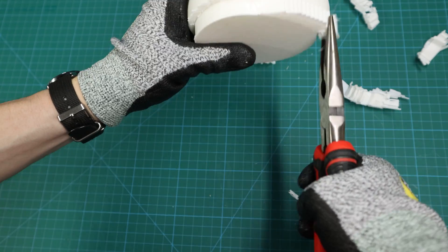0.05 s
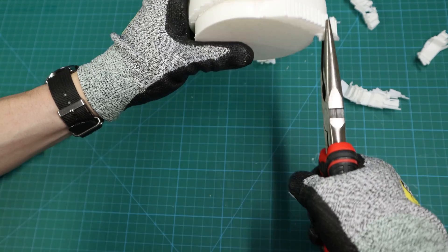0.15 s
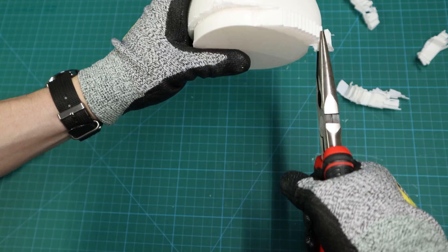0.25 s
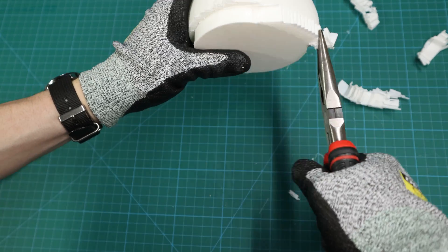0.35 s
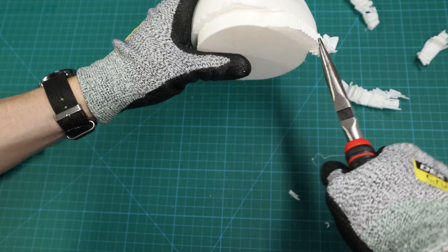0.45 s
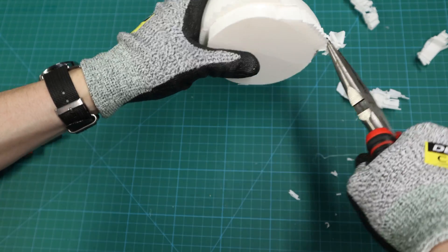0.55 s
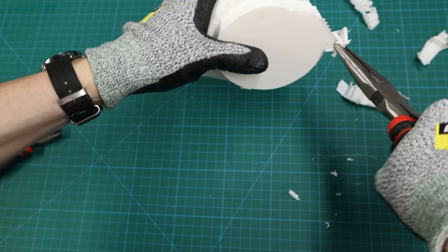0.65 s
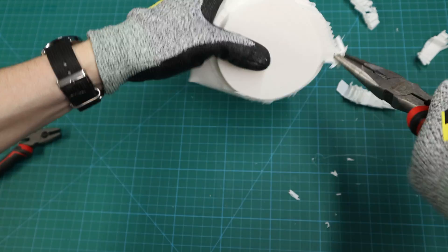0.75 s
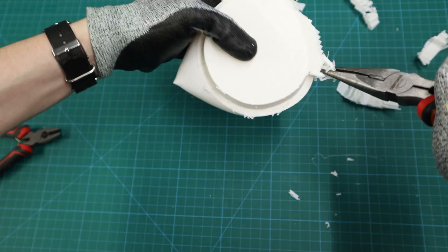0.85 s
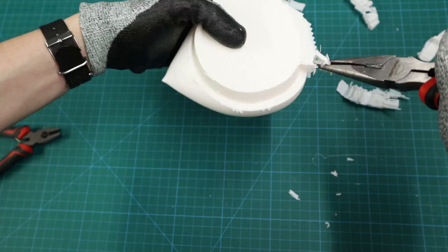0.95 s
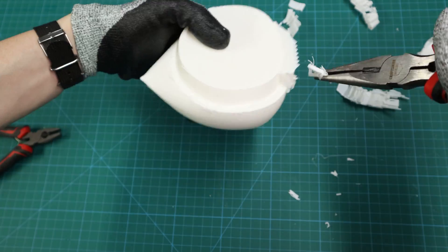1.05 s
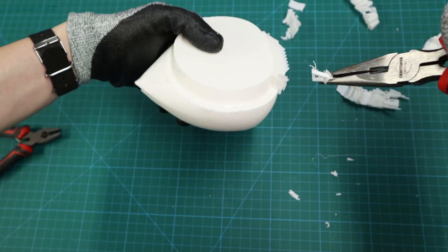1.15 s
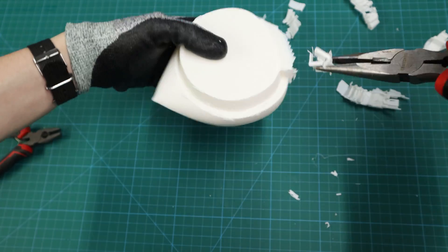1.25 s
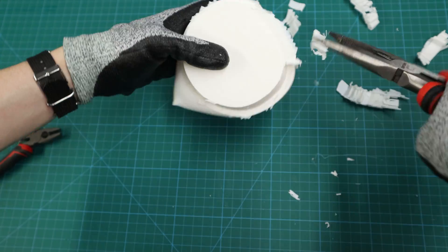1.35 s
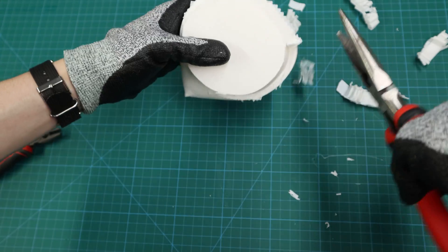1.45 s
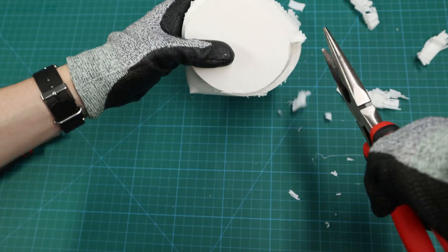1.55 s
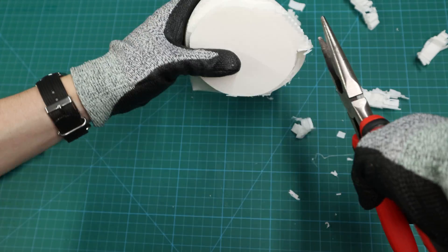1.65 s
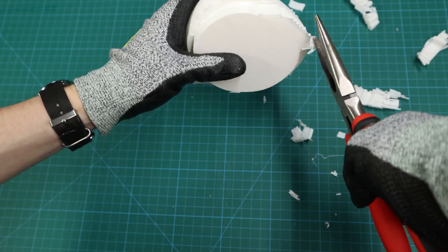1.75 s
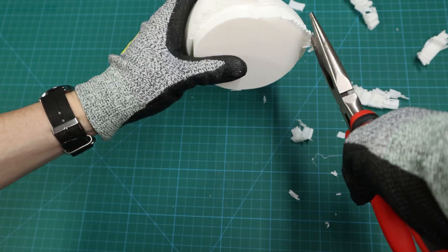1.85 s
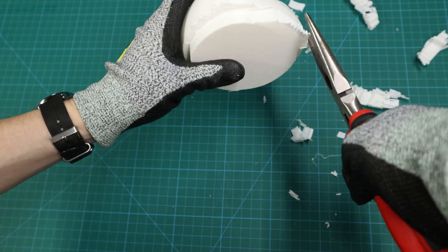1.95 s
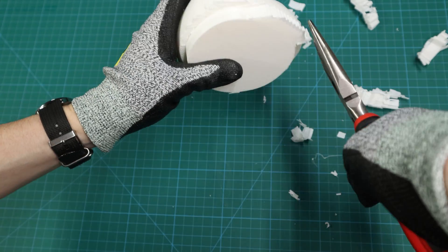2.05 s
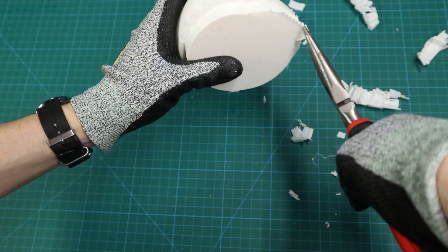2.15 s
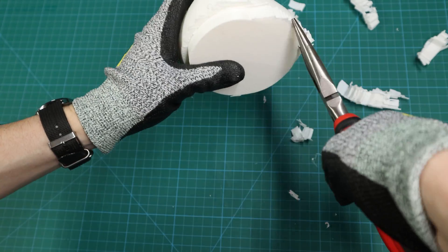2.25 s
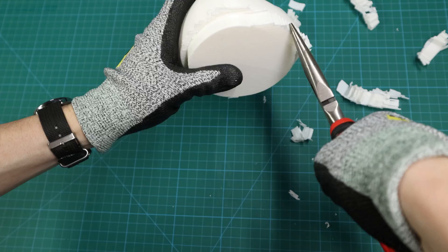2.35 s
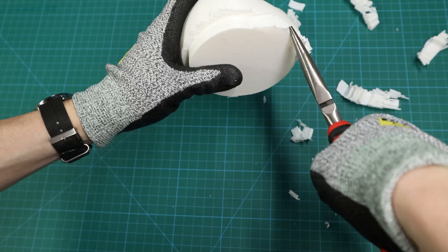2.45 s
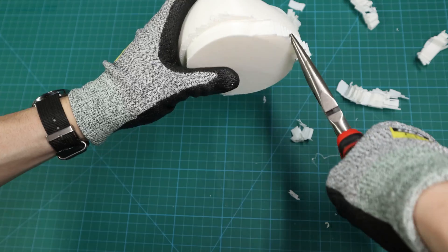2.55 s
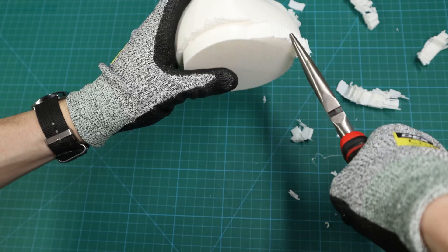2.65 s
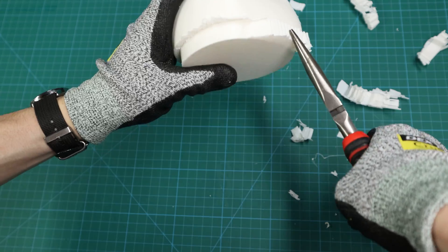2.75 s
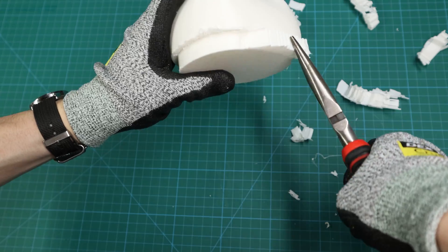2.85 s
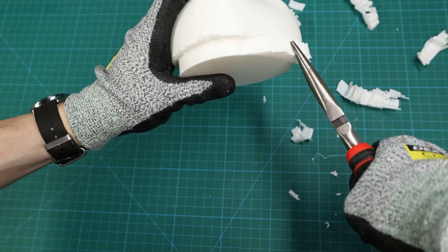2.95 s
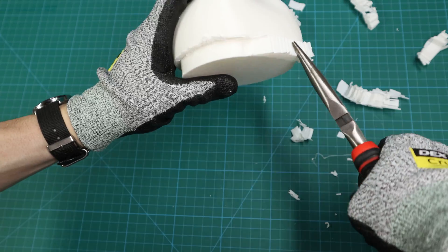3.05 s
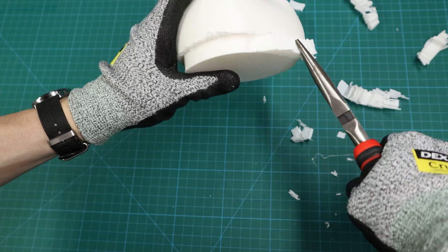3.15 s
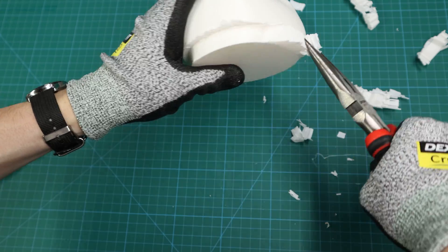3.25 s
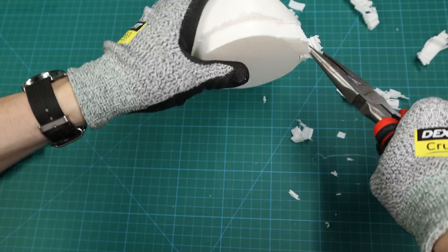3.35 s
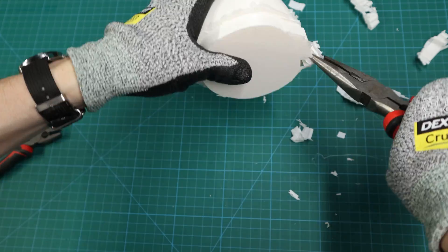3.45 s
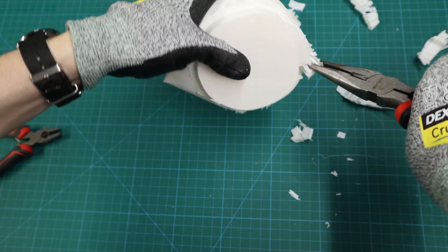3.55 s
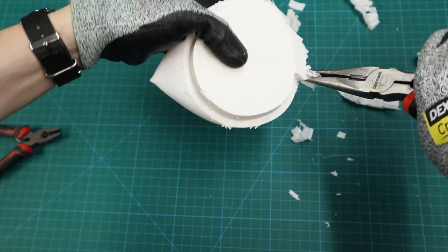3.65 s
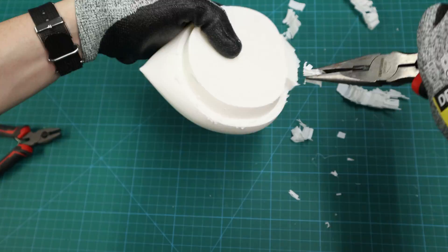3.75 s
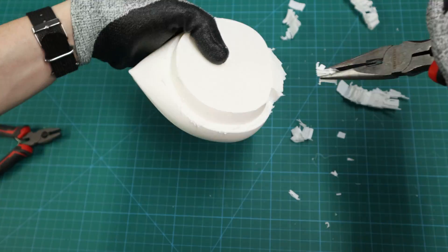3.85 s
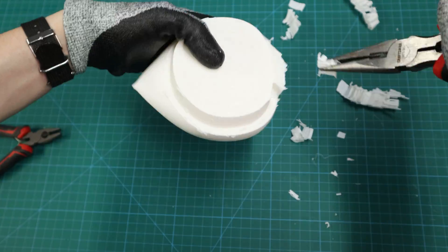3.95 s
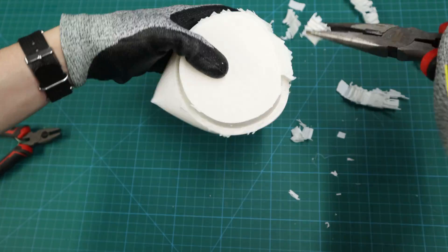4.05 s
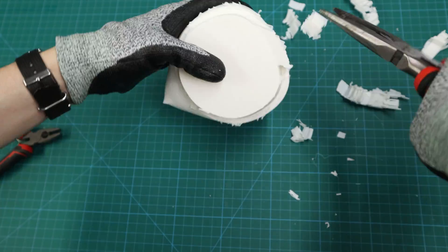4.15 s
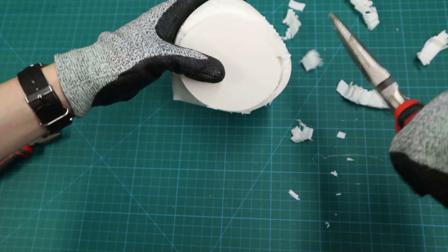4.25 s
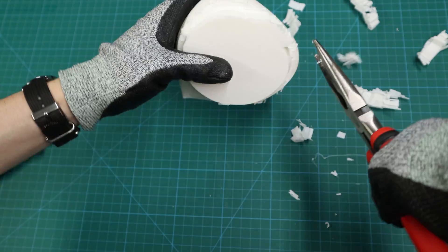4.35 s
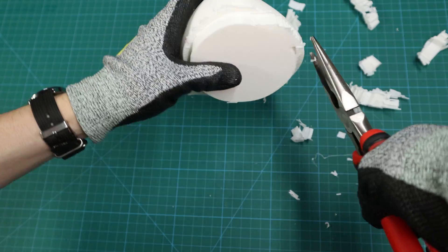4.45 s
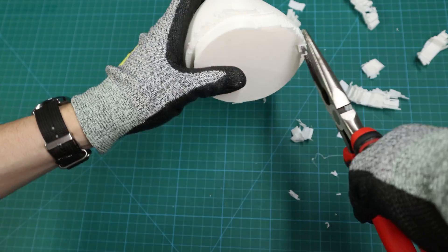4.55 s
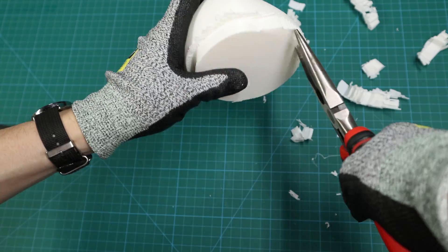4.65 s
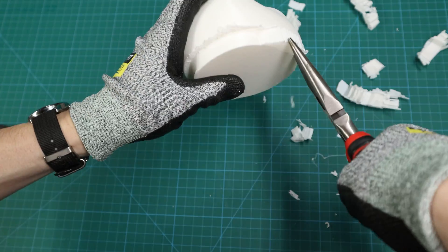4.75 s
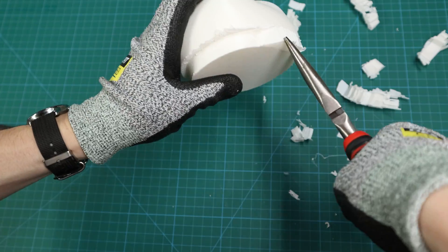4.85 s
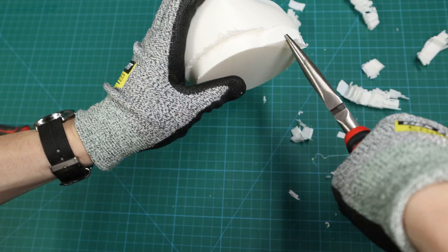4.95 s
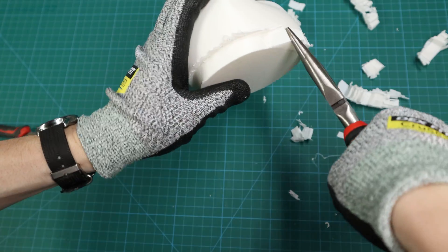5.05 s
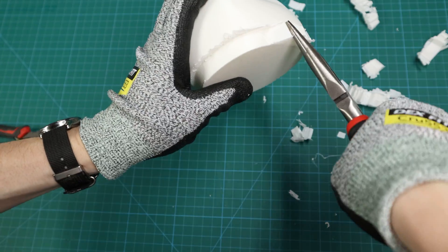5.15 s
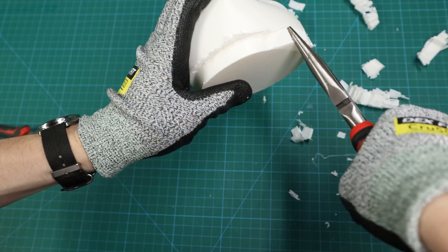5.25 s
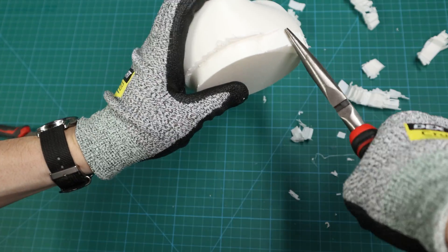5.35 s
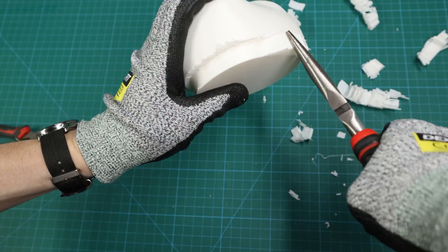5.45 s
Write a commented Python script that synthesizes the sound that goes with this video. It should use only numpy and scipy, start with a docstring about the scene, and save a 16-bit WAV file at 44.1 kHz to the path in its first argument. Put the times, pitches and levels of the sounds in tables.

```python
"""Long-nose pliers twist brittle support struts off a hollow printed plastic part, at a desk in a small room.
First struts crack, each a run of tiny fractures that rings the part; then steel jaws tick, knock and ring.
A second run of cracks ends in a soft low rumble of noise as the hand rolls the part back; then come a few
more knocks and the last cracks. In between, grains of noise rustle and small scraps snap off.
Air noise and faint hum tones lie below. The microphone is close, and the loudest cracks overload it."""
import sys
import numpy as np
from scipy import signal
from scipy.fft import rfft, irfft, next_fast_len
from scipy.io import wavfile

SR = 44100
rng = np.random.default_rng(int(sys.argv[2]) if len(sys.argv) > 2 else 0)


def to_wav(sig):
    """Store sig (one row per channel, or 1-D mono) as 16-bit WAV at the path in sys.argv[1].

    Samples outside -1..1 are clipped; the rate is SR.
    """
    pcm = np.clip(np.atleast_2d(sig), -1, 1) * 32767
    pcm = np.round(pcm).astype(np.int16)
    wavfile.write(sys.argv[1], SR, pcm.T)  # frames by channels


N = 242991
TIME = np.arange(N) / SR  # seconds, whole scene
BURST = 16384  # samples in one blow
AGE = np.arange(BURST) / SR  # seconds, one blow
HZ = np.maximum(np.fft.rfftfreq(BURST, 1 / SR), 10)
LEAD_S = .004  # a few fibres give way this long before the main break

# Loose crumbs and glove fabric rubbing. Each row: start in seconds, end in seconds, level in dB.
RUBBING = [(0.678, .83, -54.5), (1.308, 1.415, -60.5), (1.632, 1.92, -60.5), (2.924, 3.06, -62.5),
           (3.534, 3.82, -53.5), (4.085, 4.18, -64), (4.547, 4.66, -62), (4.864, 4.89, -57)]
# How alike left and right are in diffuse sound. Each row: frequency in Hz, likeness from 0 to 1.
DIFFUSE_LIKENESS = [(50, 0.49), (150, 0.91), (1200, 0.49), (3500, .25), (7000, 0.056)]


def supports():
    """The struts break as the pliers twist; a thicker strut tears longer and rings lower."""
    # Each row: start in seconds, relative treble level in dB, length of the tear in seconds,
    # relative thud level of the part in dB, brightness in dB per octave.
    cracks = [(0.139, -24, 0.0035, -39, 10), (0.1421, -7, 0.0054, -23.5, 0), (0.1781, -3, .012, -21, 3),
              (0.4023, -16, 0.011, -38, 9.5), (0.4116, -4.5, 0.0037, -25, 5),
              (0.463, -19, 0.0012, -42.5, 7.5), (0.6909, -31.5, 0.0023, -55, 13.5),
              (0.8807, -20.5, 0.0025, -41.5, 20), (0.889, -21.5, 0.0039, -35, -4),
              (0.9419, -8.5, 0.0015, -38.5, 1.5), (0.9962, -19, 0.001, -55, 0.5),
              (1.212, -45, .0024, -69, 8), (1.303, -41, .002, -64, 20), (2.1404, -22, 0.0018, -87.5, 6.5),
              (2.62, -41.5, 0.0011, -70.5, 11.5), (2.656, -24.5, .0007, -58, 5.5),
              (3.058, -23.5, 0.0019, -49, 7.5), (3.1012, -1, 0.002, -24.5, 2.5),
              (3.128, -13, .002, -31, 3.5), (3.1366, -18, .0024, -37, 4.5), (3.2308, -26, 0.0028, -50, 6.5),
              (3.2994, -22, .0008, -43, 9), (3.313, -2, .011, -22, 4), (3.4375, -7.5, 0.002, -24.5, 1),
              (3.531, -23, 0.0006, -47.5, 0), (3.584, -29.5, 0.0024, -48, 1.5),
              (3.6302, -17, 0.0025, -39, 7), (3.718, -24, 0.0016, -45.5, -1),
              (3.7316, -12, 0.0045, -37.5, 2), (3.7598, -27, 0.0055, -70, 1),
              (3.7753, -22.5, 0.00075, -68, 3.5), (3.834, -25, 0.0022, -73, 3),
              (5.1614, -23, 0.035, -34, -1), (5.205, -23, 0.0015, -30, -1),
              (5.3925, -20.5, 0.0017, -49, 15), (5.398, -26, 0.00064, -68, 0.5),
              (5.4049, -12.5, 0.0015, -40, 7.5), (5.4494, -31, 0.0013, -45.5, 0.5)]
    usual_hz, usual_tear_s = 8440, 0.0018
    sag = .2  # octaves lost per doubling of the tear
    rise = .09  # octaves gained per step of brightness: a brighter snap rings higher
    lowest_hz, highest_hz = 6700, 11700
    out = np.zeros((2, N))
    for s, db, length, thud_db, tilt_db in cracks:
        hz = usual_hz * (usual_tear_s / length) ** sag * 2 ** (rise * tilt_db)
        strut_db = hump(np.clip(hz, lowest_hz, highest_hz), width_hz=1600, db=4.0)
        sound = blow(db, length, thud_db, tilt_db, strut_db, snap_t60=0.017, thud_t60=0.021)
        add(out, s - LEAD_S, sound)
    return out


def recoil(swing_hz=48, swing_t60=.06):
    """The part jerks in the hand as a strong strut lets go: one deep, quickly damped swing, alike in both ears."""
    # Each row: start in seconds, starting level of the swing in dB.
    jerks = [(0.412, -46), (3.103, -39), (3.316, -33.5)]
    out = np.zeros((2, N))
    swing = dying(AGE, swing_t60) * np.sin(2 * np.pi * swing_hz * AGE)
    for s, db in jerks:
        add(out, s, from_db(db) * swing[None])
    return out


def pliers():
    """The jaws knock on the plastic; a firm clamp colours the tick with the steel's main band and leaves it ringing."""
    # Jaws touching and clamping the part. Each row: start in seconds, relative treble level in dB,
    # relative thud level of the part in dB, brightness in dB per octave,
    # relative ring of the steel in dB, pitch of the contact in Hz.
    jaws = [(0.111, -46, -43, -4, -5.5, 1037), (0.2375, -22.5, -43.5, 8.5, -4, 880),
            (0.5655, -41, -45.5, -2, -13.5, 4440), (1.6084, -35.5, -56.5, 2, -23.5, 12900),
            (1.7237, -43.5, -61.5, -0.5, -24, 9100), (1.836, -42.5, -67, -1.5, -22.5, 6760),
            (1.8915, -45, -69, 0, -9, 4440), (2.151, -30.5, -85, -0.5, -19, 3240),
            (2.3478, -30, -34.5, 1, 6, 377), (2.3601, -37.5, -48, 4.5, -13.5, 700),
            (2.3739, -42, -39.5, 2, -11.5, 418), (2.4362, -33.5, -45.5, 0, 5, 590),
            (2.6779, -39.5, -47, -0.5, -15, 1100), (2.93, -59, -49, -3.5, -15.5, 795),
            (2.9517, -48, -40.5, 0, -12, 697), (2.9584, -40.5, -47, 1.5, -13.5, 1000),
            (2.9854, -31, -34.5, 10, -20.5, 408), (2.9903, -23.5, -30.5, -1, -14, 411),
            (4.3872, -28.5, -43.5, 5, -26, 5800), (4.465, -37.5, -54, 2, -25.5, 12600),
            (4.539, -43.5, -75, 0, -19, 10000), (4.7224, -53, -43.5, -13.5, -14, 347),
            (4.7973, -39, -45.5, -8.5, -34, 4440), (5.1102, -34.5, -34, -5.5, -22.5, 301)]
    contact_s = .002  # a jaw seats this fast
    out = np.zeros((2, N))
    for s, db, thud_db, tilt_db, ring_db, hz in jaws:
        steel_db = hump(hz=7840, width_hz=680, db=10 * min(from_db(ring_db), 1))
        contact_db = hump(hz, width_hz=0.5 * hz, db=6)
        knock = blow(db, contact_s, thud_db, tilt_db, steel_db + contact_db, snap_t60=0.028, thud_t60=0.012)
        add(out, s - LEAD_S, knock)
        add(out, s, from_db(db + ring_db - 6.5) * steel())
    return out


def steel(split=0.016, count=5):
    """Each mode of the two jointed arms is a cluster of close partials that beat."""
    # Modes of the pliers. Each row: frequency in Hz, relative level in dB, time to fall by 60 dB in seconds.
    arm_modes = [(3200, -27, .2), (4947, -29, .25), (7300, -16, .22), (7600, -14, .27), (7830, -12, .3),
                 (8150, -16, .22)]
    t, out = np.arange(SR // 3) / SR, 0
    for hz, db, t60 in arm_modes:
        partials = hz * (1 + split * rng.uniform(-1.2, 1, (count, 1, 1)))
        turns = partials * t + rng.random((count, 2, 1))  # random starting phase on each side
        waves = np.sin((2 * np.pi * turns).astype(np.float32))
        out = out + from_db(db) * dying(t, t60) * waves.sum(axis=0) * np.sqrt(2 / count)
    return out


def crumbs(spread_db=2.0, tilt_spread_db=11.5, count=12):
    """Small scraps of support snap off at uneven intervals wherever something rubs over them."""
    per_s, tear_s = 19, 0.0013
    above_rubbing_db, thud_below_db, usual_tilt_db = 13, -24, 7.5  # the tilt is in dB per octave
    out = np.zeros((2, N))
    for start, end, db in RUBBING:
        times = start + (np.arange(count) + rng.random(count)) / per_s
        for s, (size, bright) in zip(times[times < end], rng.standard_normal((count, 2))):
            level_db = db + above_rubbing_db + spread_db * size
            tilt_db = usual_tilt_db + tilt_spread_db * bright
            thud_db = level_db + thud_below_db
            sound = blow(level_db, tear_s, thud_db, tilt_db, 0, snap_t60=0.01, thud_t60=0.019)
            add(out, s - LEAD_S, sound)
    return out


def rustle(per_s=240, grain_t60=0.025):
    """Tiny bright grains of friction while the pliers and the part move."""
    level = sum(from_db(db) * ((TIME > start) & (TIME < end)) for start, end, db in RUBBING)
    grains = (rng.random(N) < per_s / SR) * rng.rayleigh(1, N)
    fade = dying(AGE, grain_t60) ** 2
    energy = signal.fftconvolve((level * grains) ** 2, fade)[:N].clip(0)
    energy = energy / (np.mean(grains ** 2) * fade.sum())
    bright = [(500, -48.5), (2000, -8.5), (4000, 1.5), (8000, 2.0), (15000, 3.5)]  # Hz, relative dB
    return np.sqrt(energy) * coloured(rng.standard_normal((2, N)), bright)


def handling():
    """A soft low rumble of noise as the gloved hand rolls the part back."""
    # Each row: time in seconds, level in dB before an overall lift of 2 dB.
    turning = [(3.75, -66), (3.86, -60.5), (4.002, -53.5), (4.114, -78.5)]
    s, db = np.transpose(turning)
    low = [(45, -21), (75, 1.5), (100, 2.5), (160, -24), (600, -61)]  # Hz, relative dB
    rumble = coloured(rng.standard_normal((2, N)), low)
    return from_db(np.interp(TIME, s, db, left=-120, right=-120) + 2) * rumble


def blow(db, length, thud_db, tilt_db, strut_db, snap_t60, thud_t60, deepen=0.28):
    """A bright snap at the jaws and a dull thud from the walls of the part, with their echoes."""
    # Resonances of the part. Each row: frequency in Hz, width in Hz, relative lift in dB.
    part_modes = [(400, 81, 2), (614, 400, 2), (1181, 40, 3), (1940, 500, 1), (3232, 410, 6.5),
                  (4480, 88, 4), (5770, 65, 7), (5950, 43, 0.5), (6870, 130, 4), (8340, 590, 2.5),
                  (11400, 100, -0.5), (12050, 260, 5.5)]
    # Colour of the snap. Each row: frequency in Hz, relative level in dB.
    snap_colour = [(300, -31), (1000, -22.5), (2300, -14.5), (3300, -10), (4500, -1), (5600, -5.5),
                   (7300, 1), (9500, -2.5), (13000, -5), (16000, -7)]
    # Colour of the thud. Each row: frequency in Hz, relative level in dB.
    thud_colour = [(40, -17.5), (130, -9.5), (250, -7.5), (420, -3), (750, -1.5), (1200, -3.5),
                   (1900, -6.5), (2600, -14.5), (5000, -42.5)]
    part_db = sum(hump(*mode) for mode in part_modes) + grip(count=170)
    bright_db = tilt_db * np.log2(np.clip(HZ, 2500, 14000) / 7000)
    # a heavy, dull blow reaches the lower modes of the walls
    heaviness_db = np.clip(thud_db - db + 21.5, -10, 15)
    deep_db = -deepen * heaviness_db * np.log2(np.clip(HZ, 200, 2500) / 700)
    snap = causal(at_hz(snap_colour, HZ) + part_db + bright_db + strut_db)
    thud = causal(at_hz(thud_colour, HZ) + part_db + deep_db + strut_db)
    energy, snap_gain, thud_gain = fractures(length), from_db(db), from_db(thud_db)
    direct = snap_gain * struck(energy, snap, snap_t60) + thud_gain * struck(energy, thud, thud_t60)
    echoes = room(energy, snap_gain * snap + thud_gain * thud)
    # a longer tear carries more energy
    return (direct + echoes) * np.sqrt((length + 0.0035) * SR)


def fractures(length, per_s=1500, spread_db=4, fade_db=4, first=0.88, lead_db=-19, gather_db=18):
    """Energy set free over time: a few fibres give way, then the break starts a fading run of smaller ones."""
    age = AGE[:SR // 24] - LEAD_S  # zero at the main break
    gathering_db = lead_db + gather_db * age / LEAD_S
    fading_db = -fade_db * np.minimum(age / length, 1)
    course_db = np.where(age < 0, gathering_db, fading_db)
    breaks = (rng.random(len(age)) < per_s / SR) & (age < length)
    sizes = breaks * from_db(spread_db * rng.standard_normal(len(age)) + course_db)
    sizes[round(LEAD_S * SR)] = first
    return np.pad(sizes ** 2, (0, BURST - len(age)))


def struck(energy, colour, t60):
    """The dense, quickly damped modes of the plastic, heard directly; mean energy 1 a channel."""
    # How alike left and right are in direct sound. Each row: frequency in Hz, likeness from 0 to 1.
    direct_likeness = [(100, 0.4), (500, 1), (1500, 0.96), (4000, 0.96), (8000, 0), (16000, 0.04)]
    modes = at_microphone(rng.standard_normal((2, BURST)) * swell(energy, t60), direct_likeness)
    return rms_one(irfft(modes * colour)) / np.sqrt(BURST)


def swell(energy, t60):
    """Amplitude of many modes that take up this energy and lose it again; total energy 1."""
    stored = signal.lfilter([1], [1, -dying(1 / SR, t60) ** 2], energy + 1e-18)
    return np.sqrt(stored / stored.sum())


def grip(count, spread_db=2.0):
    """Each blow lands on another spot and favours other modes of the part; dB over frequency."""
    spacing = np.linspace(0, 1, count) ** 2 * (SR / 2)  # the modes lie closer in the bass
    return np.interp(HZ, spacing, spread_db * rng.standard_normal(count))


def hump(hz, width_hz, db):
    """One resonance, in dB over frequency."""
    return db / (1 + (2 * (HZ - hz) / width_hz) ** 2)


def causal(db):
    """Minimum-phase response of this shape and mean power 1: nothing sounds before its cause."""
    cepstrum = irfft(np.log(rms_one(from_db(db))))
    # fold the second half onto the first, so that the response only looks forward in time
    cepstrum[1:BURST // 2] *= 2
    cepstrum[BURST // 2 + 1:] = 0
    return np.exp(rfft(cepstrum))


def room(energy, colour, first_echo_s=0.0015, build_s=0.001):
    """A blow radiates differently in every direction: its echoes merge into a smooth tail of its colour."""
    # The room's tail. Each row: frequency in Hz, relative level in dB, time to fall by 60 dB in seconds.
    tail_bands = [(300, -22, 0.14), (1050, -14.5, 0.18), (2450, -9.5, 0.2), (6040, -10.5, 0.27),
                  (10200, -10.5, 0.27), (15300, -10.5, 0.18)]
    arriving = np.interp(AGE - first_echo_s, AGE, swell(energy, 7 * build_s) ** 2, left=0)
    white, tail = rng.standard_normal((2, BURST)), 0
    centres = [hz for hz, db, t60 in tail_bands]
    for (hz, db, t60), own in zip(tail_bands, np.eye(len(tail_bands))):
        share = at_hz(list(zip(centres, own)), HZ)  # 1 at this band's centre, 0 at its neighbours'
        tail = tail + from_db(db) * share * rfft(white * swell(arriving, t60))
    return irfft(at_microphone(irfft(tail), DIFFUSE_LIKENESS) * colour)


def at_microphone(pair, likeness, lag_s=.000035):
    """Spectra of two unrelated signals become left and right; the left comes a little later."""
    # How much louder the left channel is. Each row: frequency in Hz, difference in dB.
    left_louder = [(50, 2), (250, 4), (1200, 4.6), (4000, 1), (8000, .8), (16000, 1.6)]
    hz = np.fft.rfftfreq(pair.shape[1], 1 / SR)
    mid, side = rfft(pair)
    alike = np.clip(at_hz(likeness, hz), -1, 1)
    sign = np.array([[1], [-1]])  # left, right
    both = np.sqrt(1 + alike) * mid + sign * np.sqrt(1 - alike) * side
    both = both * from_db(sign * at_hz(left_louder, hz) / 2)
    both[0] *= np.exp(-2j * np.pi * hz * lag_s)
    return both


def coloured(pair, spectrum):
    """Give a long pair of signals a spectrum; rms 1."""
    size = next_fast_len(N, True)
    both = at_microphone(np.pad(pair, ((0, 0), (0, size - N))), DIFFUSE_LIKENESS)
    gain = from_db(at_hz(spectrum, np.fft.rfftfreq(size, 1 / SR)))
    return rms_one(irfft(both * gain, size)[:, :N])


def background(air_level_db=-59, waver=.3, left_db=1.5, phase_gap=1.0):
    """Steady air noise and a few slightly wavering lines of fan and mains hum."""
    # Colour of the air noise. Each row: frequency in Hz, relative level in dB.
    air_colour = [(20, -13.5), (40, -10), (54, 2.5), (75, -18.5), (130, -15), (220, -15.5), (420, -18),
                  (560, -24.5), (1000, -25.5), (2400, -37), (3400, -25.5), (4300, -36), (7000, -32),
                  (16000, -48)]
    # Hum tones. Each row: frequency in Hz, level in dB midway between left and right.
    hum_lines = [(119.5, -61), (192, -72.5), (299, -71), (431, -71.5)]
    out = from_db(air_level_db) * coloured(rng.standard_normal((2, N)), air_colour)
    knots = np.arange(0, N / SR + 1, .08)  # the phase wanders from one to the next; seconds
    for hz, db in hum_lines:
        wander = np.interp(TIME, knots, waver * rng.standard_normal(len(knots)))
        phase = wander + np.array([[phase_gap], [0]])  # radians; left, right
        gain = from_db(db + np.array([[left_db], [-left_db]]))
        out += gain * np.sqrt(2) * np.sin(2 * np.pi * hz * TIME + phase)
    return out


def from_db(db):
    """Decibels to gain."""
    return 10 ** (np.asarray(db) / 20)


def rms_one(x):
    """Scale to an rms (average strength) of 1."""
    return x / np.sqrt(np.mean(x ** 2) + 1e-20)


def at_hz(points, hz):
    """Read a table on a log-frequency axis."""
    f, value = np.transpose(points)
    return np.interp(np.log(np.maximum(hz, 1)), np.log(f), value)


def dying(t, t60):
    """Falls by 60 dB in t60 seconds."""
    return from_db(-60 * t / t60)


def add(out, s, sound):
    """Mix a stereo sound in at s seconds."""
    start = round(s * SR)
    out[:, start:start + sound.shape[1]] += sound[:, :N - start]


def scene():
    """The work at the desk over the room's background."""
    work = supports() + recoil() + pliers() + crumbs() + rustle() + handling()
    return work + background()


def record(dry, top=0.73, lopsided=0.051, cutoff_hz=15750):
    """The input flattens the loudest peaks, the negative side a little sooner; the top of the band is cut."""
    limit = top * (1 + lopsided * np.sign(dry))
    clipped = dry / (1 + (dry / limit) ** 4) ** (1 / 4)
    low_pass = signal.ellip(10, .2, 80, cutoff_hz, fs=SR, output="sos")
    return signal.sosfilt(low_pass, clipped)


dry = scene()
out = record(dry)
to_wav(out)
```